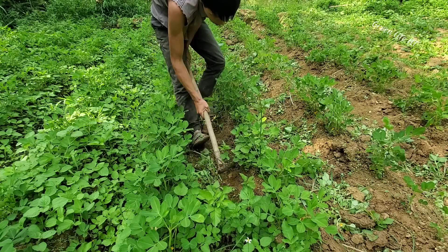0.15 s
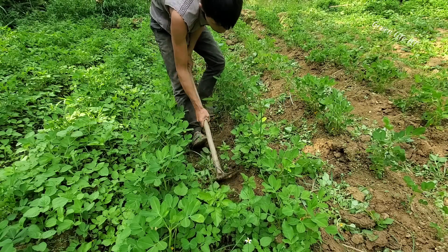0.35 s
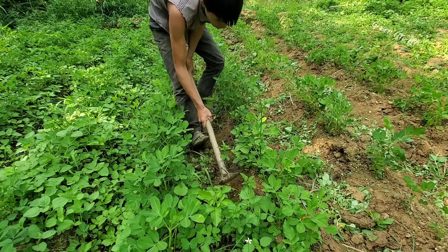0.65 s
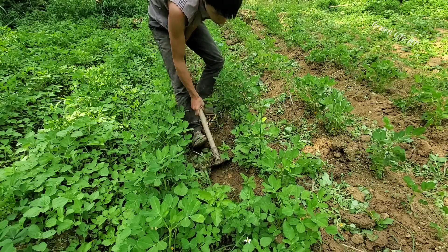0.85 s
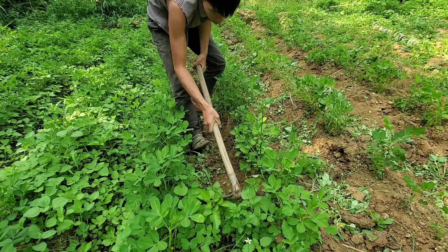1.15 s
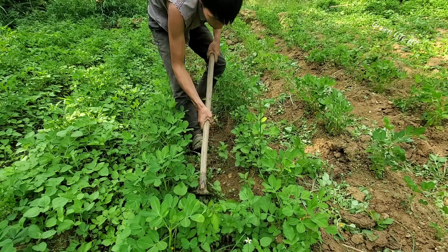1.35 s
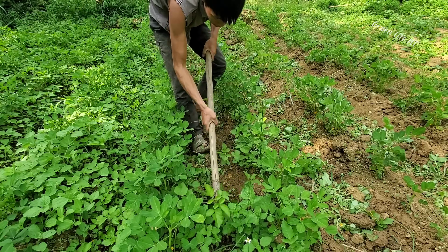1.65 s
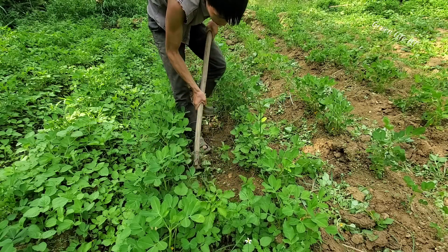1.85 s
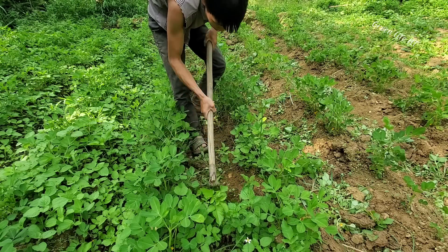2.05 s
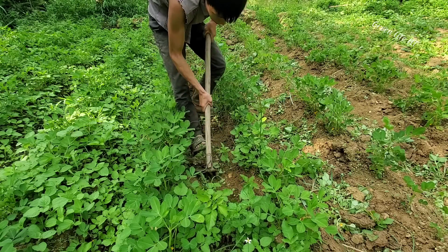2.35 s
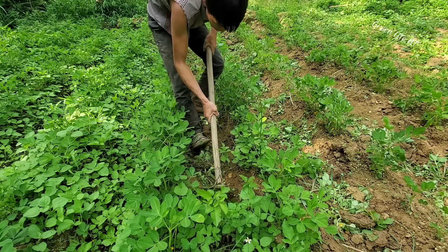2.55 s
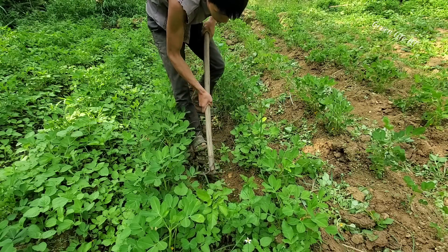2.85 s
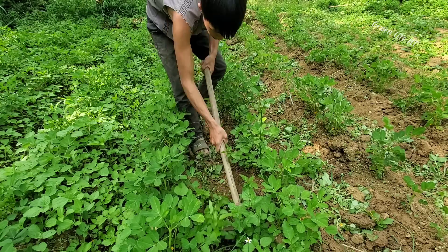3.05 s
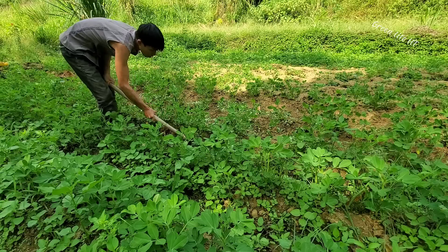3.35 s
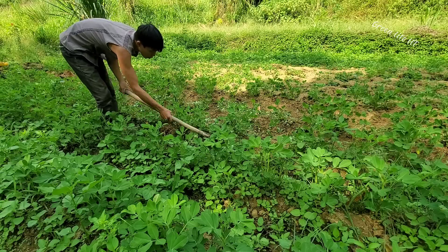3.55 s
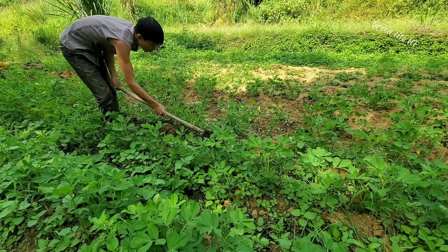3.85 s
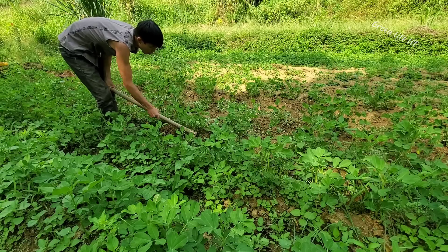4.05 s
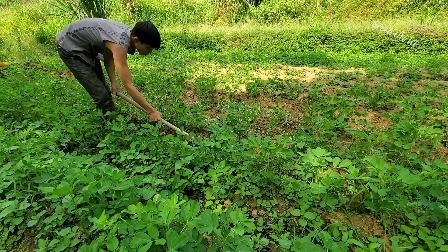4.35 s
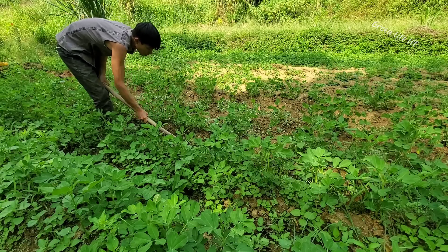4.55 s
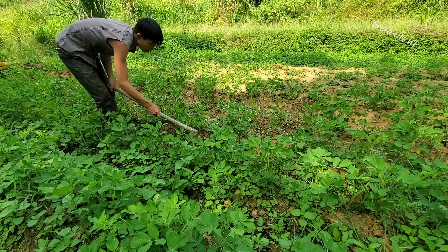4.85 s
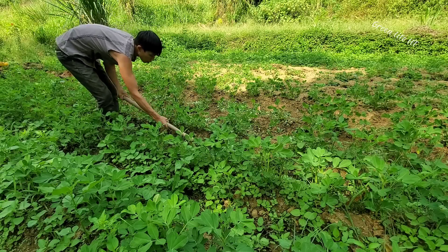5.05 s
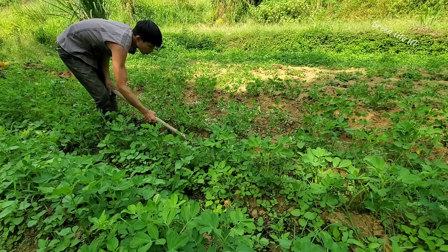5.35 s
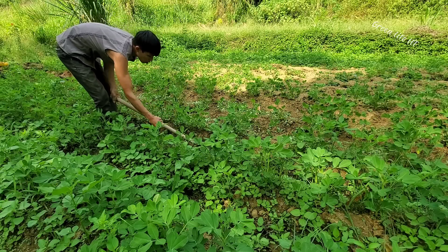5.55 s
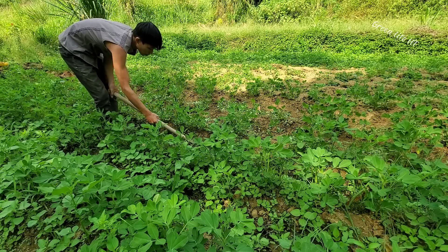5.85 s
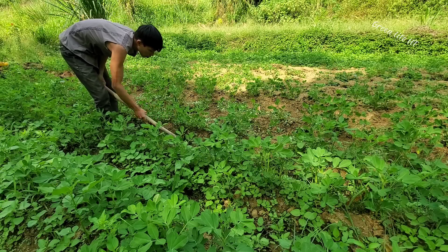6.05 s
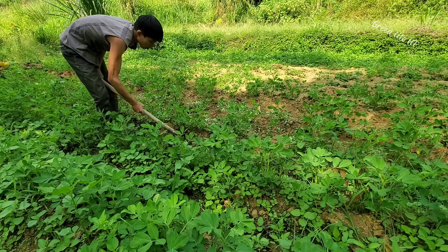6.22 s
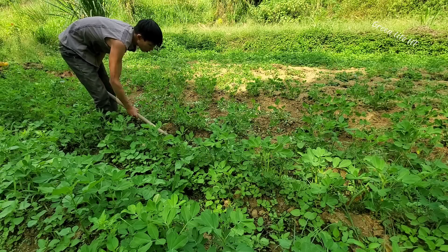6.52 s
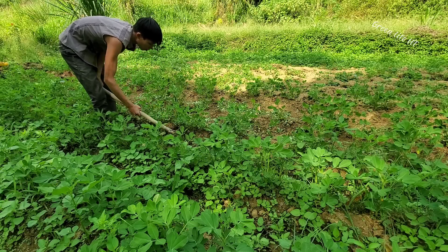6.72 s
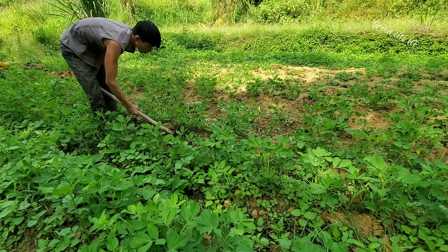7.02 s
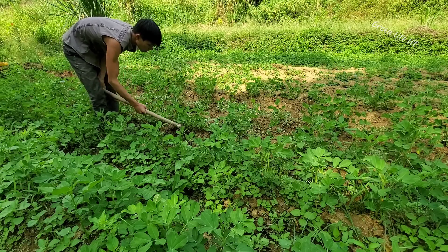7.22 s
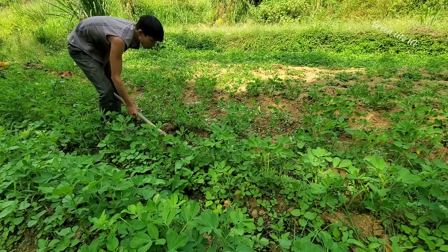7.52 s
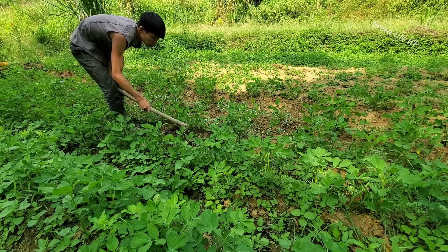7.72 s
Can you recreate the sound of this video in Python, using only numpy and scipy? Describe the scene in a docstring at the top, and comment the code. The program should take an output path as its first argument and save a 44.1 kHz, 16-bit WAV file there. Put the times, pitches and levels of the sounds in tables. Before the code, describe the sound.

A hand hoe chops weeds in dry, stony soil at a steady pace, blade biting and dragging, stones clinking, while cicadas pulse in the background.

```python
"""A dry field: a hand hoe chops weeds, a little over two strokes a second, heard from two places in turn.
In each stroke the blade bites and is then pulled through: earth thuds, crumbs crunch, stems tear, stones clink.
Earth, steel and leaves are swelling trains of random grains, filtered by soil, foliage and tool resonances.
Swept tones make the pulsing cicadas, sines a far motor and a brief whine, filtered noise the open air."""
import sys
import numpy as np
from scipy import signal
from scipy.fft import rfft, irfft, next_fast_len
from scipy.io import wavfile
from scipy.ndimage import uniform_filter1d

SR = 44100
rng = np.random.default_rng(int(sys.argv[2]) if len(sys.argv) > 2 else 0)


def master(y):
    """Save y as 16-bit WAV."""
    cut = np.clip(np.atleast_2d(y).T, -1, 1)
    pcm = np.round(cut * 32767)  # scale
    wavfile.write(sys.argv[1], SR, pcm.astype(np.int16))


N = 347508
TIME = np.arange(N) / SR
SIZE = next_fast_len(N + SR // 2, real=True) // 2 * 2
FREQ = np.maximum(np.arange(SIZE // 2 + 1) * SR / SIZE, 1)

# Strokes of the hoe, levels before the layer gains; where the edge bites decides which two resonances speak.
# Each row: bite in seconds, bite in dB, its earth in dB re bite, drag in dB, wait until the pull in seconds,
# pull in dB, its earth in dB re pull, weeds in dB re each push, ground thump in dB re thud,
# lower resonance in Hz, its lift in dB, upper resonance in Hz, its lift in dB.
STROKES = [(0.013, -41.5, 8.5, -40, 0.035, -45, -13, 3.5, -9, 1370, 0, 5040, 5.5),
           (0.4, -41, -6.5, -40, 0.068, -43, -3, 3.5, -18, 1380, 1, 4860, -3),
           (0.825, -40, 0, -51.5, 0.067, -43.5, 0, 3, -15, 1320, 4, 2640, -1),
           (1.408, -52.5, -16, -47.5, 0.031, -39.5, -0.5, 5, -5, 1220, -2, 4440, 0),
           (1.82, -44, 1.5, -43.5, 0.075, -48, -12, 6.5, -1.5, 780, 7.5, 1470, 9),
           (2.279, -45.5, 1, -48, 0.052, -45, -4, 4, -5.5, 1410, -1, 2720, -1),
           (2.693, -42, -2, -44.5, 0.059, -46.5, -6, 2.5, -4.5, 780, 9, 3800, 0),
           (3.266, -45, -1, -41.5, 0.097, -38.5, -4, 3, -6.5, 1190, 4, 2800, 6.5),
           (3.719, -47, 2.5, -46.5, 0.028, -46.5, -3, 9, -1, 1270, 5, 2920, 2),
           (4.111, -42, -1, -46, 0.06, -54.5, -0.5, 5, -6, 233, 3.5, 2827, 6),
           (4.568, -34.5, 1.5, -56, 0.059, -33.5, -18, 0, -10.5, 1613, -1, 4400, 4.5),
           (5.134, -42.5, 0, -50.5, 0.056, -40, 3, 6, -19, 1858, 5, 4770, 4.5),
           (5.641, -43.5, 2.5, -52, 0.062, -45.5, -9, 6.5, -4, 905, 4.5, 1400, 4.5),
           (6.031, -51.5, -19, -54, 0.096, -41, 1, 4, -32, 455, 2.5, 1235, 1.5),
           (6.531, -46.5, -24, -47, 0.038, -44.5, 5.5, 7.5, -13, 1360, 8, 2780, 4),
           (7.036, -38, 1, -63, 0.021, -72, 2, 2, -18, 1380, 6, 2880, 7.5),
           (7.503, -52, -5.5, -53.5, 0.021, -49.5, 0, 5.5, -5, 1352, 7.5, 1653, 4)]
# Left-right likeness of far sound. Each row: frequency in Hz, likeness 0-1.
FAR_LIKENESS = [(60, 0.64), (130, 0.45), (290, 0.36), (640, 0), (1400, 0.033)]


def undb(db):
    """Decibels to gain."""
    return 10 ** (np.asarray(db) / 20)


def curve(points):
    """A table of (Hz, value) joined on a log-frequency axis."""
    hz, value = np.transpose(points)
    return np.interp(np.log(FREQ), np.log(hz), value)


def curve_gain(points):
    """Gain of a spectrum given as (Hz, dB)."""
    return undb(curve(points))


def band(low_hz, high_hz, order=4):
    """Gain of a pass band; a higher order steepens both edges."""
    low_edge = 1 + (low_hz / FREQ) ** (2 * order)
    high_edge = 1 + (FREQ / high_hz) ** (2 * order)
    return (low_edge * high_edge) ** -.5


def bump(hz, width_hz):
    """Bell of height 1 round a resonance."""
    return 1 / (1 + (2 * (FREQ - hz) / width_hz) ** 2)


def colour(x, gain):
    """Causal minimum-phase filter of the given shape that keeps the power of white noise."""
    cepstrum = irfft(np.log(gain / np.sqrt(np.mean(gain ** 2)) + 1e-5))
    # fold the cepstrum onto positive time
    cepstrum[1:SIZE // 2] *= 2
    cepstrum[SIZE // 2 + 1:] = 0
    response = np.exp(rfft(cepstrum))
    return irfft(rfft(x, SIZE) * response)[..., :N]


def noise():
    """Two unrelated channels of white noise, rms 1."""
    return rng.standard_normal((2, N))


def walk(rate_hz):
    """Smooth random wander with a spread near 1."""
    hold = max(int(SR / rate_hz), 1)
    steps = np.repeat(rng.standard_normal(N // hold + 1), hold)
    smooth = uniform_filter1d(uniform_filter1d(steps, hold), hold)
    return smooth[:N] * np.sqrt(2)


def grains(per_s, spread_db):
    """Tiny fractures of uneven size, rms near 1; each reaches the two channels with its own strength."""
    struck = rng.random(N) < per_s / SR
    size = struck * undb(spread_db * np.minimum(rng.exponential(size=N), 4))
    return size * noise() / np.sqrt(np.mean(size ** 2))


def ports(pair, likeness, lag_ms=0):
    """Two unrelated signals become left and right: as alike as the table says, the right delayed by the lag."""
    # Each row: frequency in Hz, left minus right in dB.
    balance = [(100, -3), (300, 0), (650, 3.5), (2200, 3), (4500, 2.5), (6500, 6), (9500, -2.5), (14000, 3)]
    a, b = rfft(pair, SIZE)
    alike = np.clip(curve(likeness), 0, 1)
    lean = curve_gain(balance)
    delay = np.exp(-2j * np.pi * FREQ * lag_ms / 1000)
    right = (alike * a + np.sqrt(1 - alike ** 2) * b) * delay
    keep_power = np.sqrt(2 / (1 + lean ** 2))
    return irfft(np.array([a * lean, right]) * keep_power)[:, :N]


def swells(times, rises, falls, levels_db):
    """Force that builds up to each peak and dies away exponentially after it; the powers add."""
    power = np.zeros(N)
    for s, rise, fall, db in zip(times, rises, falls, levels_db):
        span = slice(max(int((s - .1) * SR), 0), int((s + .4) * SR))
        since = TIME[span] - s
        decay = np.where(since < 0, (since / rise) ** 2, since / fall)
        power[span] += (undb(db) * np.exp(-decay)) ** 2
    return np.sqrt(power)


def stroke_spans():
    """The samples that belong to each stroke, from just before its bite until the next."""
    edges = [max(int((row[0] - .04) * SR), 0) for row in STROKES] + [N]
    return [slice(start, end) for start, end in zip(edges, edges[1:])]


def hoe_ring(strength):
    """Gain of the tool's resonances; earth packed round the blade weakens them."""
    # Resonances of blade and handle. Each row: frequency in Hz, width in Hz, lift in dB at strength 1.
    modes = [(238, 41, 9), (352.4, 69, 8), (524, 89, 3.5), (1015, 66, 2), (1167, 65, 4.5), (1404, 120, 6.5),
             (1657, 91, 7.5), (1855, 105, 4.5), (2783, 89, 6), (3065, 100, 0.5), (3900, 110, 4.5),
             (4300, 64, 2.5), (4960, 170, 4), (6000, 260, 5), (6720, 270, 8.5)]
    return undb(strength * sum(db * bump(hz, width_hz) for hz, width_hz, db in modes))


def pushes():
    """Each stroke brushes, bites, drags, pulls and settles: rows of peak, rise, fall (s), thud, crunch, tear (dB)."""
    # Weeds and clods knocked aside between strokes.
    # Each row: peak in seconds, rise and fall in seconds, crunch in dB, tearing in dB.
    debris = [(0.088, 0.012, -45.5, -44.5), (0.938, 0.009, -54, -45), (1.198, 0.0096, -67, -44),
              (1.981, 0.016, -61.5, -47), (2.822, 0.06, -55.5, -56.5), (2.897, 0.0098, -54.5, -60),
              (3.196, 0.0084, -48.5, -41), (3.815, 0.021, -58, -52), (5.224, 0.0066, -42.5, -46),
              (5.268, 0.023, -52.5, -51), (6.069, 0.01, -55, -44.5), (6.599, 0.0097, -54, -41.5),
              (7.113, 0.016, -61, -68)]
    debris_thud_db = -8  # re crunch
    brush_rise_s, brush_db, brush_tear_db = 0.02, -21, 6.5  # the blade passes through leaves on its way down
    bite_rise_s, bite_fall_s = 0.0061, 0.013  # the edge enters the ground
    drag_peak_share, drag_rise_share, drag_fall_share = 0.36, 0.18, 0.46  # of the wait from bite to pull
    pull_rise_share, pull_fall_s = 0.29, 0.018  # force builds over a share of the wait, then the soil gives
    # turned earth slumps behind the blade
    settle_after_s, settle_s, settle_db, settle_thud_db = 0.053, 0.033, -21.5, -11
    rows = []
    for s, bite, bite_earth, drag, wait, pull, pull_earth, weeds, *_ in STROKES:
        brush = bite + brush_db
        settle = pull + settle_db
        drag_earth = (bite_earth + pull_earth) / 2
        rows += [
            (s, brush_rise_s, bite_fall_s, brush + bite_earth, brush, brush + weeds + brush_tear_db),
            (s, bite_rise_s, bite_fall_s, bite + bite_earth, bite, bite + weeds),
            (s + drag_peak_share * wait, drag_rise_share * wait, drag_fall_share * wait,
             drag + drag_earth, drag, drag + weeds),
            (s + wait, pull_rise_share * wait, pull_fall_s, pull + pull_earth, pull, pull + weeds),
            (s + wait + settle_after_s, settle_s, settle_s,
             settle + settle_thud_db, settle, settle + weeds)]
    for s, length_s, crunch, tear in debris:
        rows.append((s, length_s, length_s, crunch + debris_thud_db, crunch, tear))
    return rows


def clods(force, soil):
    """Single clods and roots give way; the larger the piece, the lower its knock."""
    out = np.zeros((2, N))
    for hz in np.geomspace(420, 4200, 5):
        breaks = grains(70, spread_db=1)
        octave = band(hz / np.sqrt(2), hz * np.sqrt(2), order=2)
        out += colour(force * breaks, soil * octave)
    return out


def digging():
    """The blade shoves earth, crushes crumbs and tears stems; loose soil trickles down afterwards."""
    # Breaking soil. Each row: frequency in Hz, spectral density in dB per Hz.
    soil_spectrum = [(50, -17), (120, 1.5), (220, 0.5), (290, -6), (420, -0.5), (700, -5), (1500, -4),
                     (2200, -4.5), (3200, 0), (5000, 0.5), (6900, -3), (7800, -8.5), (10000, -2.5),
                     (15500, -7.5)]
    thud_late_s = 0.0017  # the mass of earth moves just after its crust breaks
    s, rise, fall, thud_db, crunch_db, tear_db = np.transpose(pushes())
    thud = swells(s + thud_late_s, rise, fall, thud_db)
    crunch = swells(s, rise, fall, crunch_db)
    tear = swells(s, rise, fall, tear_db)
    soil = curve_gain(soil_spectrum) * hoe_ring(strength=0.78)
    slip = undb(0.98 * walk(170) - 1.7)  # the edge sticks and slips from clod to clod

    out = undb(-1.0) * colour(thud * grains(1500, spread_db=1.5), soil * band(168, 1006))
    out += undb(-1.0) * colour(crunch * slip * grains(3000, spread_db=-1.0), soil * band(800, 3230))
    out += undb(-1.4) * colour(tear * slip * grains(11000, spread_db=2.2), soil * band(2670, SR / 2))
    out += undb(-11.5) * clods(crunch, soil)

    weight = np.zeros(N)
    for span, (*_, thump_db, _, _, _, _) in zip(stroke_spans(), STROKES):
        weight[span] = undb(thump_db)  # deep strokes shake the ground
    out += colour(thud * weight * grains(3000, spread_db=2.5), band(53, 73))

    trickle = swells(s + 0.017, rise, np.full(len(s), .07), crunch_db)
    crumbs = grains(110, spread_db=3)
    return out + undb(-20) * colour(trickle * crumbs, soil * band(260, 6400, order=2))


def stones():
    """Steel skids over a stone in a burst of sharp ticks that ring the blade."""
    # Stones that the blade hits, levels before the layer gains.
    # Each row: peak in seconds, fall in seconds, ring in dB, crack in dB.
    hits = [(0.011, 0.0043, -26.5, -21.5), (0.0208, 0.0048, -27.5, -31), (0.0485, 0.0037, -44, -26),
            (0.0868, 0.0027, -48, -37), (0.4215, 0.0056, -44, -27.5), (0.869, 0.0048, -33, -51),
            (0.8914, 0.006, -27.5, -31), (2.7513, 0.0064, -35, -33), (3.2864, 0.0061, -22.5, -20),
            (3.2953, 0.0019, -21, -43), (3.367, 0.0019, -28, -44), (4.26, 0.014, -52, -55),
            (4.5657, 0.0042, -24, -26.5), (4.588, 0.0037, -28.5, -40), (4.6158, 0.0075, -29.5, -20),
            (4.6269, 0.0036, -23.5, -20.5), (5.1341, 0.0078, -24.5, -27), (5.14, 0.002, -33, -18.5),
            (5.67, 0.003, -58, -25.5), (5.6785, 0.0061, -35, -25), (5.703, 0.0096, -32.5, -29.5),
            (6.029, 0.01, -38, -41), (6.108, 0.0062, -33, -34)]
    # Stone on steel. Each row: frequency in Hz, spectral density in dB per Hz.
    steel_spectrum = [(300, 18), (900, 2.5), (1700, 2.5), (2250, -1.5), (3200, -0.5), (4700, 4), (7000, -1),
                      (8500, -4.5), (15500, -6)]
    s, fall, ring_db, crack_db = np.transpose(hits)
    rise = np.full(len(s), .0008)
    ring, crack = swells(s, rise, fall, ring_db), swells(s, rise, fall, crack_db)
    steel = curve_gain(steel_spectrum) * hoe_ring(strength=1.0)
    out = undb(-4.5) * colour(ring * grains(12000, spread_db=-1.8), steel * band(870, 4000))
    return out + undb(-1.8) * colour(crack * grains(20000, spread_db=1.0), steel * band(2450, SR / 2))


def voiced(x, width_hz, width_share):
    """Every stroke loads the blade at another point and so favours two resonances of its own."""
    out = x.copy()
    for span, (*_, low_hz, low_db, high_hz, high_db) in zip(stroke_spans(), STROKES):
        for hz, db in ((low_hz, low_db), (high_hz, high_db)):
            b, a = signal.iirpeak(hz, hz / (width_hz + width_share * hz), fs=SR)
            out[:, span] += (undb(db) - 1) * signal.lfilter(b, a, x[:, span])
    return out


def leaves():
    """Leaves stirred by legs and handle brush and tick in small flurries, more softly during each swing."""
    # Each row: time in seconds, level in dB before trim, flurries and swings.
    rustle = [(0.0, -60), (0.53, -72), (1.34, -62), (1.47, -69), (2.17, -63.5), (2.46, -72), (2.72, -80),
              (2.87, -75), (3.11, -52), (3.27, -65), (3.53, -65.5), (4.52, -69.5), (4.74, -64), (5.93, -76),
              (7.7, -62.5), (7.88, -66.5)]
    # Brushed leaves. Each row: frequency in Hz, spectral density in dB per Hz.
    leaf_spectrum = [(100, -15), (300, -12), (800, 1), (1300, 5.5), (2000, 2.5), (4500, 9.5), (6500, -2.5),
                     (8000, -3), (10000, 4.5), (15500, 4)]
    trim_db, flurry_db = 0.9, 3.4
    swing_before_s, swing_s, swing_db = 0.069, 0.068, -3  # the hoe is in the air
    swing = sum(np.exp(-((TIME - s + swing_before_s) / swing_s) ** 2) for s, *_ in STROKES)
    db = np.interp(TIME, *np.transpose(rustle)) + trim_db
    db += flurry_db * walk(21.753) + swing_db * swing
    return colour(undb(db) * grains(1400, spread_db=1), curve_gain(leaf_spectrum))


def cicadas():
    """Each near cicada sweeps a rasping tone downward in every pulse; the trees and the far chorus blur it."""
    # Each row: start in seconds, end in seconds, mean pulses a second, centre pitch in Hz,
    # downward sweep in Hz, level in dB before the pulse shape, left minus right in dB.
    singers = [(0, 3.5, 21, 6100, 383, -62.5, 13.5), (0, 3.21, 20.4, 6650, 250, -80, 22),
               (3.229, 7.88, 20.2, 6300, 446, -57, 9.5), (3.23, 6.7, 14, 5450, 404, -64, 7)]
    out = np.zeros((2, N))
    for start, end, rate_hz, hz, sweep_hz, db, pan_db in singers:
        cycle = np.cumsum(rate_hz * (1 + .012 * walk(5))) / SR % 1
        pitch_hz = hz + sweep_hz * (.5 - cycle) + 25 * walk(27)
        tone = np.exp(2j * np.pi * np.cumsum(pitch_hz) / SR)
        pulse = .2 + 1.2 * np.sin(np.pi * cycle) ** 2
        rasp = np.array([walk(380) + 1j * walk(380) for _ in range(2)])
        scattered = colour(noise(), band(hz - 300, hz + 300, order=24))
        song = .78 * pulse * np.real(tone * rasp) + .3 * scattered
        side_gain = undb(db + np.array([[pan_db], [-pan_db]]) / 2)
        out += side_gain * song * ((TIME >= start) & (TIME < end))
    # crossed edges leave a narrow peak near 5.8 kHz
    far = colour(noise(), band(5860, 5770, order=12)) * undb(1.2 * walk(25))
    return out + undb(-61) * ports(far, FAR_LIKENESS)


def motor():
    """A far engine hums as sines at multiples of its wavering firing rate; each partial fades in and out."""
    # Each row: time in seconds, mean firing rate in Hz, level in dB.
    course = [(0, 66, -69), (2.9, 72.4, -87), (3.4, 83, -71), (3.8, 85.1, -57), (5.0, 84.05, -60),
              (5.85, 80.1, -62), (6.05, 77.1, -74), (6.7, 75, -75), (7.88, 72.2, -75)]
    # Each row: multiple of the firing rate, mean level in dB re the course.
    partials = [(1, 0.5), (2, -18.5), (3, -26.5), (6, -20.5), (7, -17), (9, -25.5)]
    s, hz, db = np.transpose(course)
    rate_hz = np.interp(TIME, s, hz) * (1 + .009 * walk(30))
    turn = 2 * np.pi * np.cumsum(rate_hz) / SR
    hum = sum(undb(part_db + 2.5 * walk(26)) * np.sin(round(k) * turn) for k, part_db in partials)
    return hum * undb(np.interp(TIME, s, db))


def air():
    """Uneven outdoor rumble under a thin hiss, both of filtered noise."""
    # Rumble of the open air. Each row: frequency in Hz, spectral density in dB per Hz.
    rumble_spectrum = [(20, -45), (35, -23), (55, 5), (75, -2.5), (110, -11), (200, -27), (500, -55)]
    # Thin hiss. Each row: frequency in Hz, spectral density in dB per Hz.
    hiss_spectrum = [(60, -1), (200, 3), (350, -1.5), (780, 5), (1300, -5), (1900, 2.5), (2500, 0),
                     (4800, 4.5), (8000, -9.5), (11000, -4.5), (15500, 5)]
    rumble = colour(noise(), curve_gain(rumble_spectrum)) * undb(-65.5 + 0.6 * walk(10))
    hiss = colour(noise(), curve_gain(hiss_spectrum)) * undb(-60.0 + 0.2 * walk(3.36))
    return ports(rumble + hiss, FAR_LIKENESS)


def whine():
    """A thin tone wavers in the distance for about a second, fading in and out."""
    # Each row: time in seconds, mean pitch in Hz.
    glide = [(5.9, 524), (6.25, 484), (6.4, 498), (6.5, 567), (6.7, 517), (6.82, 525)]
    peak_s, rise_s, fall_s, level_db = 6.28, 0.33, 0.7, -71
    pitch_hz = np.interp(TIME, *np.transpose(glide)) * (1 + 0.0306 * walk(70))
    turn = 2 * np.pi * np.cumsum(pitch_hz) / SR
    since = TIME - peak_s
    fade = np.exp(-(since / np.where(since < 0, rise_s, fall_s)) ** 2)
    return undb(level_db + 3 * walk(19)) * fade * np.sin(turn)


def scene():
    """The work lies nearly ahead at first, then further to the left."""
    # Left-right likeness of near sound. Each row: frequency in Hz, likeness 0-1.
    near_likeness = [(200, .98), (500, .95), (1200, .86), (2200, .7), (4000, .5), (6500, .3), (11000, .13)]
    move_s = 3.22
    hoe = voiced(digging() + stones(), width_hz=110, width_share=.04)
    work = hoe + leaves()
    ahead = ports(work, near_likeness, lag_ms=0.054)
    left = ports(work, near_likeness, lag_ms=0.074)
    # from straight ahead the top octave is brighter
    treble = signal.butter(1, 9000, "high", fs=SR, output="sos")
    ahead = ahead + 1.2 * signal.sosfilt(treble, ahead)
    return np.where(TIME < move_s, ahead, left) + cicadas() + motor() + air() + whine()


def record(dry):
    """A steep low-pass filter cuts the top."""
    top_hz = 15800
    return signal.sosfilt(signal.ellip(10, .2, 80, top_hz, fs=SR, output="sos"), dry)


dry = scene()
out = record(dry)
master(out)
```